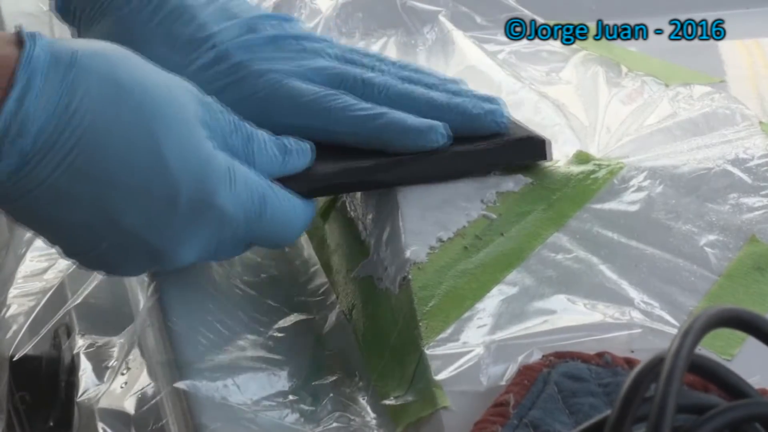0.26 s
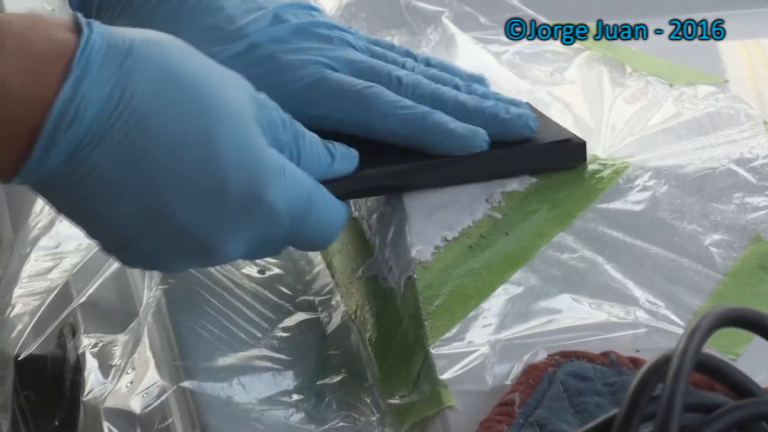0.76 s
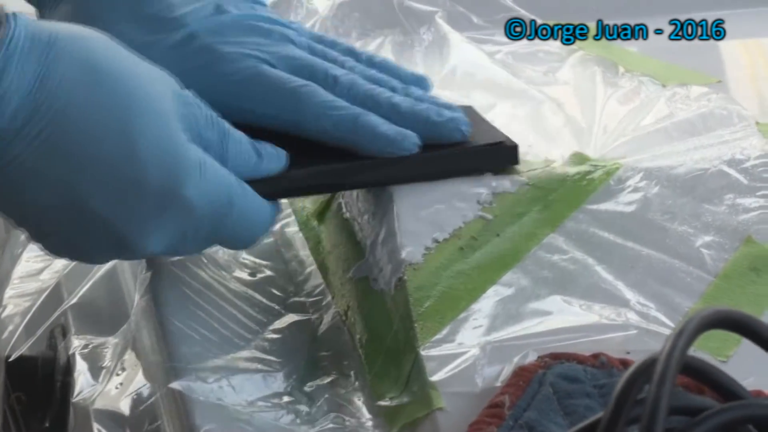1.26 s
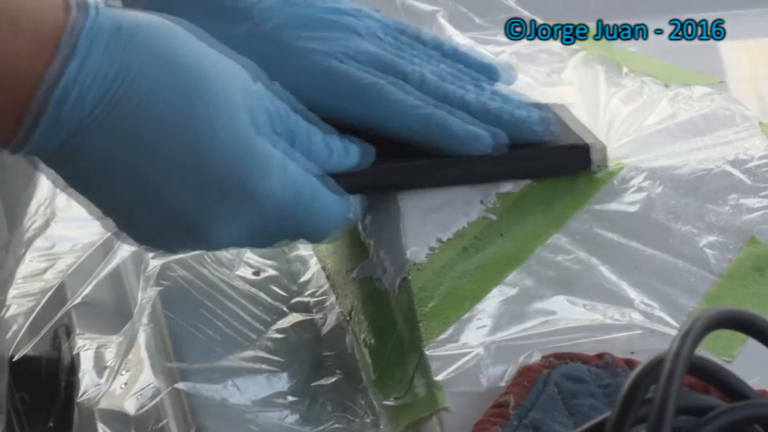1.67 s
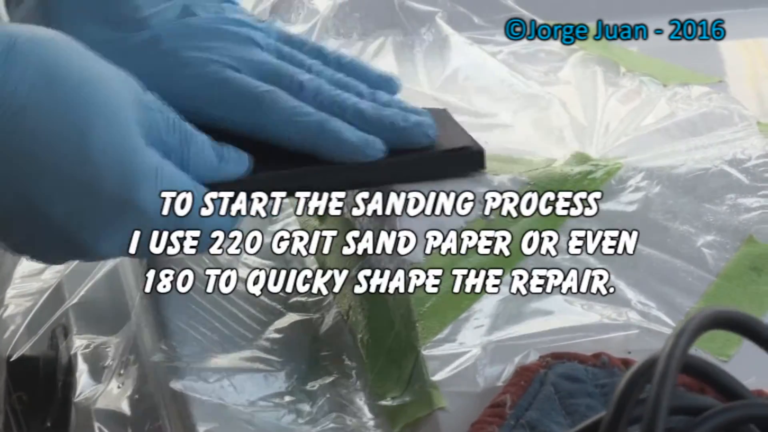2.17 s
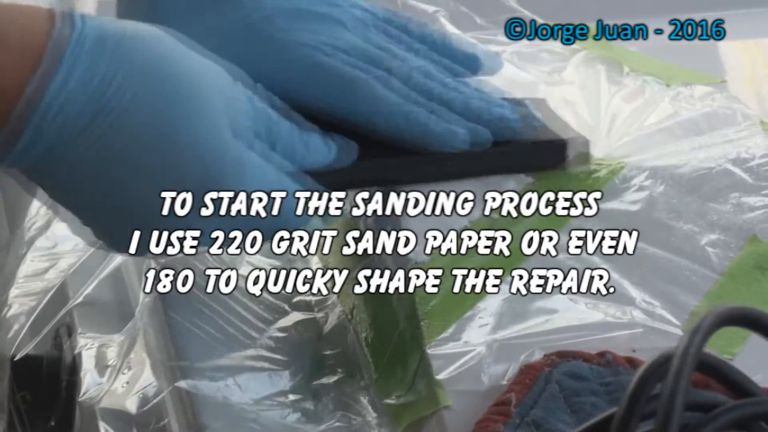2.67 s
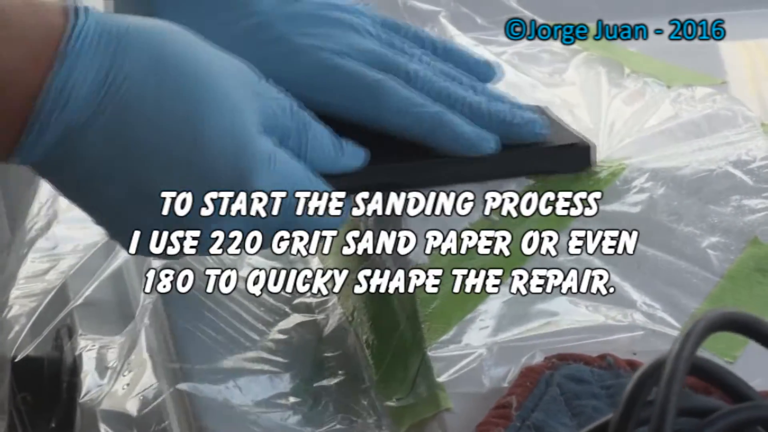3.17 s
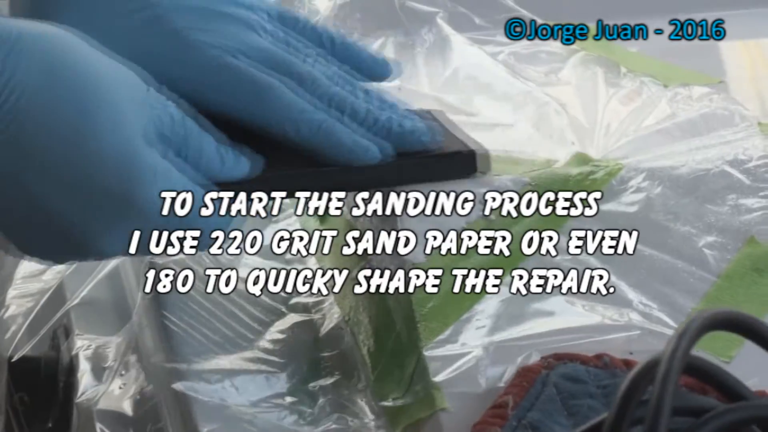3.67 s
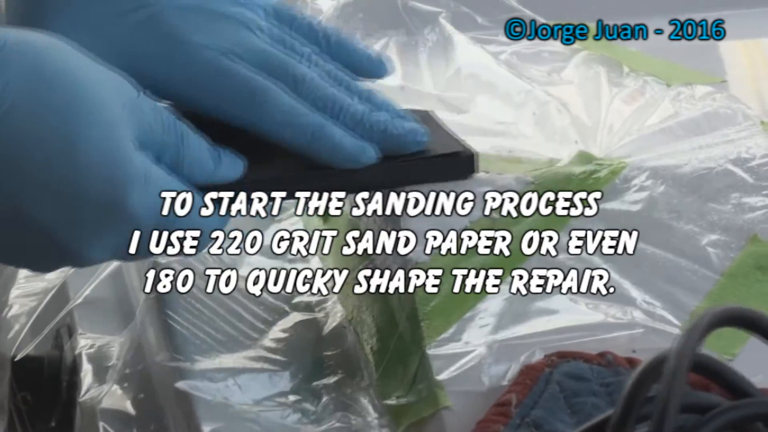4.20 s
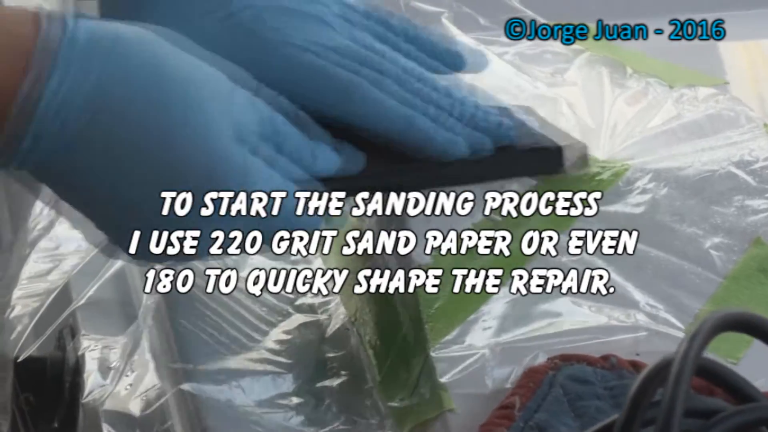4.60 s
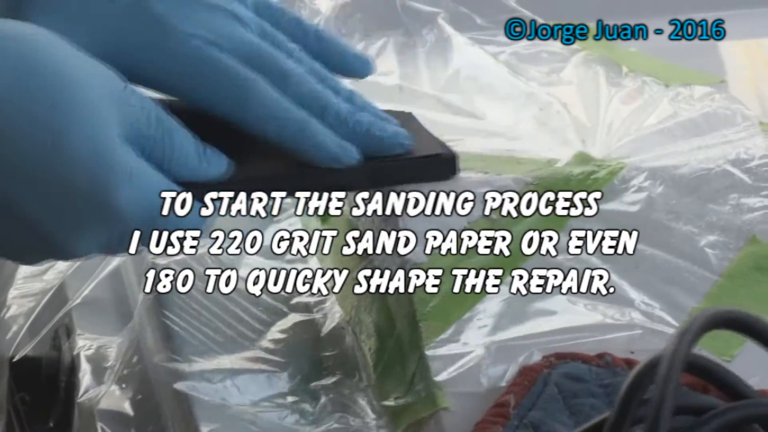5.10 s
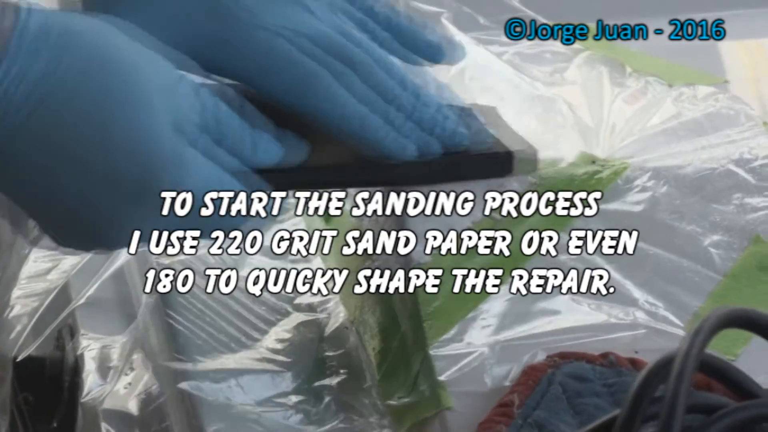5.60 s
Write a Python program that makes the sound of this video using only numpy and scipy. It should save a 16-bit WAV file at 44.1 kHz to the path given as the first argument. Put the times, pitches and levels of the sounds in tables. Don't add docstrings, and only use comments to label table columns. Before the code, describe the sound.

Outdoors in a yard, a heavy engine drones close by for about a second, then recedes. Faint, hesitant brushes of sandpaper become firm jabs, then fast, even to-and-fro rasps on a hard coated hull, about seven strokes a second. Plastic sheeting ticks and snaps once. Low traffic rumble stays on the right. Close stereo microphone, natural open air.

```python
import sys
import numpy as np
from scipy import signal
from scipy.fft import rfft, irfft, next_fast_len
from scipy.io import wavfile

SR = 44100
rng = np.random.default_rng(int(sys.argv[2]) if len(sys.argv) > 2 else 0)


def elevation(decibels):
    levels = np.asarray(decibels, float)
    return 10 ** (levels / 20)


def persist_wave(psi):
    counts = np.round(np.clip(psi, -1, 1) * 32767).astype(np.int16)
    wavfile.write(sys.argv[1], SR, np.atleast_2d(counts).T)


N = 257984
TIME, SIZE = np.arange(N) / SR, next_fast_len(N)
BINS = np.arange(SIZE // 2 + 1) * SR / SIZE + 1e-3


def rms_one(x):
    return x / np.sqrt(np.mean(x ** 2) + 1e-20)


def in_time(rows):
    s, *columns = np.transpose(rows)
    return [np.interp(TIME, s, c) for c in columns]


def fade(rows, ramp_s=0.44):
    inside_s = np.minimum(TIME - rows[0][0], rows[-1][0] - TIME)
    return np.clip(inside_s / ramp_s + 1, 0, 1)


def over_hz(points):
    hz, *columns = np.transpose(points)
    return [np.interp(np.log(BINS), np.log(hz), c) for c in columns]


def drift(rate_hz):
    r = np.exp(-80 * np.pi * rate_hz / SR)
    slow = signal.lfilter([1], [1, -2 * r, r * r], rng.standard_normal(N // 40 + 2002))[2000:]
    return np.interp(np.arange(N) / 40, np.arange(len(slow)), rms_one(slow))


def at_ports(shared, own, gain, ports):
    balance_db, lead, alike = over_hz(ports)
    balance, alike = elevation(balance_db), np.clip(alike, 0, 1)
    right = rfft(shared, SIZE)
    other_path = np.sqrt(1 - alike ** 2) * rfft(own, SIZE)
    left = (alike * np.exp(1j * lead) * right + other_path) * balance
    mid_gain = np.sqrt(1 + balance ** 2 + 2 * alike * balance * np.cos(lead)) / 2
    both = irfft(np.array([left, right]) * gain / mid_gain, SIZE)[:, :N]
    return both / np.sqrt(np.mean(both.mean(axis=0) ** 2))


def grains(per_s, spread_db):
    sizes = elevation(spread_db * np.minimum(rng.exponential(1, N), 5)) * rng.standard_normal(N)
    return rms_one(sizes * (rng.random(N) < per_s / SR))


def stroke_plan():
    # turn_s, turn_level_db, stroke_level_db, hull_over_grit_db, late_minus_early_db
    settling = [
        (0.0, -62, -53, -4, 6),
        (0.16, -64, -60.5, 5, 3),
        (0.245, -70, -60, 2, -2),
        (0.36, -48, -42.5, -0.5, -13),
        (0.579, -68, -39, -5.5, 13.5),
        (0.759, -44, -40.5, -2, 5.5),
        (0.911, -48, -43.5, -6.5, -9),
        (1.083, -65, -37, -2.5, 6.5),
        (1.234, -42, -37, -5, -1),
        (1.395, -46, -38.5, -2, 4),
    ]
    # turn_s, stroke_level_db, hull_over_grit_db
    even_strokes = [(1.54, -34.5, -8.5), (1.7, -34.5, -4.5), (1.849, -33.5, -6), (2.008, -35.5, -3.5),
                    (2.157, -35, -5.5), (2.305, -33, -3.5), (2.456, -32, -6), (2.603, -33, -6.5),
                    (2.751, -35.5, -6), (2.903, -36, -2), (3.048, -38.5, -5.5), (3.182, -37, -3),
                    (3.33, -35.5, -2.5), (3.484, -33.5, -4.5), (3.627, -35, -4.5), (3.777, -34.5, -4.5),
                    (3.919, -36.5, -4.5), (4.069, -33.5, -3), (4.214, -35.5, -6), (4.357, -32.5, -4.5),
                    (4.504, -34, -5), (4.648, -33.5, -4.5), (4.799, -36.5, -4.5), (4.943, -33.9, -5),
                    (5.086, -32.5, -6), (5.237, -32.5, -4.5), (5.384, -35, -3), (5.526, -35.5, -1.5),
                    (5.668, -35, -4), (5.812, -34.5, -2)]
    stroke_s, turn_drop_db = 0.147, 8
    push_lean_db, pull_lean_db = 0.9, 1.7

    turn_s, db, hull_db = np.transpose(even_strokes)
    before_db = np.append(settling[-1][2], db[:-1])
    turn_db = (before_db + db) / 2 - turn_drop_db
    lean_db = np.where(np.arange(len(turn_s)) % 2, pull_lean_db, push_lean_db)
    even = np.transpose([turn_s, turn_db, db, hull_db, lean_db])
    last_turn = even[-1] + [stroke_s, 0, 0, 0, 0]
    rows = np.vstack([settling, even, last_turn])
    peaked = 1.106 * (np.diff(rows[:, 0]) / stroke_s) ** 0.53
    peaked[3:8] *= 1.7
    return (*rows.T, peaked)


def sanding():
    # mode_hz, width_hz, level_db
    hull_modes = [(1790, 48, 2), (2400, 22, 8), (2592, 49, 7), (2720, 67, 4.5), (2966, 33, 7),
                  (3170, 34, 3.5), (3820, 36, 4.5)]
    # freq_hz, level_db (per Hz)
    rasp_colour = [(700, -20), (1300, -10.5), (1900, -6), (2600, -6.5), (3400, -4.5), (4500, -3.5),
                   (7000, -3.5), (9500, -4.5), (11000, -3), (12500, -7.5), (14000, -12), (15800, -18)]
    band_edges = [400, 1500, 2200, 3000, 4000, 5500, 8000, 11500, 20000]
    # freq_hz, left_minus_right_db, left_lead_rad, likeness (0-1)
    ports_hand = [(700, -1, -.5, 0.6), (1500, -7.5, -0.2, .65), (2500, -3.5, 0.2, 0.66),
                  (5000, -7, -0, 0.5), (7000, -7, 0.6, 0.5), (9500, -0.3, 0.8, .72), (11100, 2, 0.4, .75),
                  (11750, -7.5, 0, 0.7), (12300, -9.5, 0, .72), (13550, -10.5, 0, .72), (13750, -24, 0, .6),
                  (15500, -36, 0, .4)]

    turns, turn_db, stroke_db, hull_db, lean_db, peaked = stroke_plan()
    k = np.clip(np.searchsorted(turns, TIME, "right") - 1, 0, len(turns) - 2)
    along = np.clip((TIME - turns[k]) / (turns[k + 1] - turns[k]), 0, 1)
    speed = np.abs(np.sin(np.pi * along))
    push = elevation(stroke_db[k] + 2.08 + 1.77 * lean_db[k] * (along - 0.5))
    rest = elevation(np.interp(TIME, turns, turn_db) - 4.0)

    ring = 1
    for hz, width_hz, db in hull_modes:
        ring = ring + (elevation(db) - 1) / (1 + (2 * (BINS - hz) / width_hz) ** 2)
    colour = elevation(over_hz(rasp_colour)[0]) * ring
    grit, echoes, out = grains(16000, 0.3), grains(16000, 0.89), 0
    for low, high, way in zip(band_edges, band_edges[1:], [1, -1] * 4):
        gain = colour / np.sqrt((1 + (low / BINS) ** 12) * (1 + (BINS / high) ** 12))
        share = np.sqrt(np.sum(gain ** 2) / np.sum(colour ** 2))
        octaves = np.log2(np.sqrt(low * high) / 4000)
        pressed_db = (hull_db[k] + 5.5) * np.clip(0.6 - 0.81 * octaves, 0, 1.5)
        swell = push * elevation(pressed_db) * speed ** (peaked[k] * (0.89 + 0.11 * octaves))
        rasp = at_ports(np.roll(grit, low)[::way], np.roll(echoes, low)[::way], gain, ports_hand)
        flicker = elevation((1.88 - 0.043 * octaves) * drift(13.3))
        out = out + rasp * share * flicker * np.hypot(swell, rest * elevation(-1.1 * octaves))
    return out * elevation(0.25 * drift(26.0))


def tone(hz, level_db, pan_db, lag, wobble_db):
    phase = 2 * np.pi * (np.cumsum(hz) / SR + rng.random())
    height = np.sqrt(2) * elevation(level_db + wobble_db * drift(9.5))
    left = elevation(pan_db)
    mid_gain = np.sqrt(1 + left ** 2 + 2 * left * np.cos(lag)) / 2
    return height / mid_gain * np.array([left * np.sin(phase - lag), np.sin(phase)])


def swells(rows, under_db):
    power = elevation(under_db) ** 2
    for s, db, half_width_s in rows:
        power = power + elevation(db - 5.3 * ((TIME - s) / half_width_s) ** 2) ** 2
    return 10 * np.log10(power)


def near_engine(drone_hz, pan_db):
    # time_s, level_db
    nearness = [(0, -33), (.3, -30), (1.0, -33.5), (1.16, -35.5), (1.31, -43.5), (1.7, -49), (2.2, -53)]
    # peak_s, level_db, half_width_s
    fifth_swells = [
        (0.0, -31, 0.1),
        (.36, -35.5, .12),
        (.66, -32, .12),
        (1.0, -37, .12),
    ]
    # drone_eighths, level_db, peak_s, spread_s
    orders = [(7, -11, .1, 0.28), (10, -8, 0.23, 0.61), (11, -4, 0.068, 0.4), (13, -4, 0.11, 0.15),
              (13, 1.5, 1.14, 0.21), (14, 5.5, 1.104, 0.098), (25, -14.5, 0.43, 0.25),
              (16, -4.5, 0.09, 0.19), (21, -12.5, 0.13, 0.24), (19, -6.5, 0.63, 0.42),
              (22, -3.5, 1.2, 0.71), (28, 15, 1.93, 0.094), (29, -6.5, 0.046, 0.13), (29, -0.5, 0.55, 0.19)]
    # freq_hz, level_db (per Hz)
    roar_colour = [(25, -18), (60, -12), (110, -3.5), (200, -1), (280, -8.5), (400, -8.5), (500, -0.5),
                   (620, -2.5), (980, -7.5), (1400, -17.5), (2100, -22.5), (3200, -35), (9000, -42),
                   (15000, -76)]
    # freq_hz, left_minus_right_db, left_lead_rad, likeness (0-1)
    ports_near = [(40, -9, -0.88, 0.68), (248, 2, -1.5, 0.82), (700, -2.5, -0.36, 0.96),
                  (2500, -1.5, -0.34, 0.33), (9000, 1, 0.63, .5)]

    roar_db, = in_time(nearness)
    upper_db = roar_db + 5.0 - 13.5 * np.minimum(TIME, 1.3)
    near = tone(drone_hz * 5 / 8, swells(fifth_swells, roar_db - 18), pan_db, 1.05, 1.0)
    for eighths, db, peak_s, spread_s in orders:
        order_db = upper_db + db - 7.8 * ((TIME - peak_s) / spread_s) ** 2
        near += tone(drone_hz * eighths / 8, order_db, pan_db, 0.74, 1.47)
    roar = at_ports(*rng.standard_normal((2, N)), elevation(over_hz(roar_colour)[0]), ports_near)
    near += elevation(roar_db) * roar
    return near * fade(nearness, ramp_s=0.99)


def far_engines(drone_hz):
    # time_s, level_db
    far_mid = [(1.35, -56), (1.48, -43), (1.76, -47.5), (2.32, -40.5), (2.45, -54), (2.9, -47.5),
               (3.2, -56), (3.78, -52), (4.2, -59)]
    # time_s, pitch_hz, level_db
    far_low = [(0.9, 36.7, -62), (1.56, 34.5, -60), (1.94, 32.6, -52), (2.52, 30.1, -50), (3.12, 29.0, -49),
               (3.41, 28.8, -60.5), (3.7, 31.2, -64)]
    mid = tone(drone_hz * 0.746, *in_time(far_mid), -16, 0.55, 0.56)
    low = tone(*in_time(far_low), -18, 0.55, 0.72)
    return fade(far_mid) * mid + fade(far_low) * low


def engines():
    # time_s, pitch_hz
    engine_pitch = [(0, 133.9), (1.2, 134), (2.6, 132.6), (5.45, 116.1), (5.85, 116.8)]
    # time_s, level_db
    drone_close = [(0.03, -21.5), (0.08, -24.5), (0.15, -20.5), (0.34, -36), (0.39, -31), (0.44, -42),
                   (0.5, -19.5), (0.57, -28), (0.62, -19.5), (0.73, -18.5), (0.77, -23.5), (1.11, -29),
                   (1.25, -45), (1.74, -37), (2.02, -41), (2.13, -51)]
    # peak_s, level_db, half_width_s
    drone_swells = [
        (2.72, -45, .2),
        (3.3, -45.5, 0.23),
        (3.86, -44, 0.028),
        (4.45, -49, 0.072),
        (4.74, -45, .04),
        (4.92, -43.5, 0.03),
        (5.5, -41.5, .14),
        (5.85, -39.5, .08),
    ]
    close_pan_db, gone_pan_db, corner_at_s, corner_s = -3.5, -16.5, 1.22, 0.066

    drone_hz, = in_time(engine_pitch)
    gone = 1 / (1 + np.exp((corner_at_s - TIME) / corner_s))
    pan_db = close_pan_db + (gone_pan_db - close_pan_db) * gone
    drone = tone(drone_hz, swells(drone_swells, *in_time(drone_close)), pan_db, 0.9, 0.42)
    return drone + near_engine(drone_hz, pan_db) + far_engines(drone_hz)


def road():
    # time_s, level_db
    road_level = [(0, -40.5), (1.5, -40), (2.3, -44), (3.4, -44), (3.8, -45.5), (4.7, -45), (5.85, -46.5)]
    # freq_hz, level_db (per Hz)
    road_colour = [(15, -25), (30, -7), (70, -2.5), (120, -3), (170, -6), (250, -7.5), (370, -14),
                   (490, -7), (630, -11.5), (820, -7.5), (1300, -12.5), (2000, -17.5), (3500, -26.5),
                   (9000, -44.5)]
    # freq_hz, left_minus_right_db, left_lead_rad, likeness (0-1)
    ports_road = [(40, -26, -.5, .85), (200, -16.5, -0.24, 0.65), (400, -12, -0.55, 0.69),
                  (900, -7.5, -0.72, 0.84), (2500, -5.5, 0.072, 0.36), (9000, -29, .5, 0.19)]
    rumble = at_ports(*rng.standard_normal((2, N)), elevation(over_hz(road_colour)[0]), ports_road)
    return elevation(in_time(road_level)[0] + 2.5) * rumble


def ticks():
    # start_s, peak_db, centre_hz
    tick_events = [(.0214, -38, 4500), (.0404, -37, 5500), (.0484, -42, 6000), (.2, -37, 9500),
                   (.2001, -44, 6000), (.2084, -37, 6500), (.3114, -37, 7000), (0.318, -37, 10000),
                   (.3115, -40, 11000), (.3915, -30, 10500), (0.6936, -18, 10000), (0.7743, -31, 7000),
                   (.998, -33, 9000), (1.026, -29, 10000), (1.7596, -21.5, 2450), (2.9502, -26, 3110),
                   (2.9503, -21, 5200), (4.2724, -29.5, 2450), (4.283, -23, 5800)]
    # start_s, level_db
    snap_events = [
        (1.5567, 0),
        (1.5574, -5),
        (1.5628, -10),
        (1.5634, -8),
        (1.567, -13),
    ]
    # mode_hz, peak_db
    snap_modes = [(2270, -27), (5130, -22), (6600, -20.5), (10000, -25)]
    # start_s, peak_db, pitch_hz, t60_s
    knocks = [
        (2.296, -37, 236, 0.096),
        (4.441, -33.5, 135, 0.11),
    ]

    out, after = np.zeros((2, N)), np.arange(SR // 5) / SR
    snaps = [(s, db + mode_db, hz) for s, db in snap_events for hz, mode_db in snap_modes]
    rings = [(s, db, hz, 10.8 / hz) for s, db, hz in [*tick_events, *snaps]]
    for s, db, hz, t60_s in [*rings, *knocks]:
        decay = elevation(db + 6.0 - 60 * after / t60_s)
        onset = 1 - np.exp(-after * hz * 2.9)
        snap = decay * np.sin(2 * np.pi * hz * after) * onset
        pan_db = -4.6 if hz > 500 else -13.0
        at = round(s * SR)
        out[:, at:at + len(snap)] += snap * elevation(np.array([[pan_db], [0]]) + 4.5)
    return out


def scene():
    return sanding() + engines() + road() + ticks()


def band_limit(x):
    return signal.sosfilt(signal.butter(12, 16610, fs=SR, output="sos"), x)


def record(dry):
    mix = irfft(rfft(dry, SIZE) * (BINS < 15850), SIZE)[:, :N]
    return band_limit(mix)


dry = scene()
out = record(dry)
persist_wave(out)
```